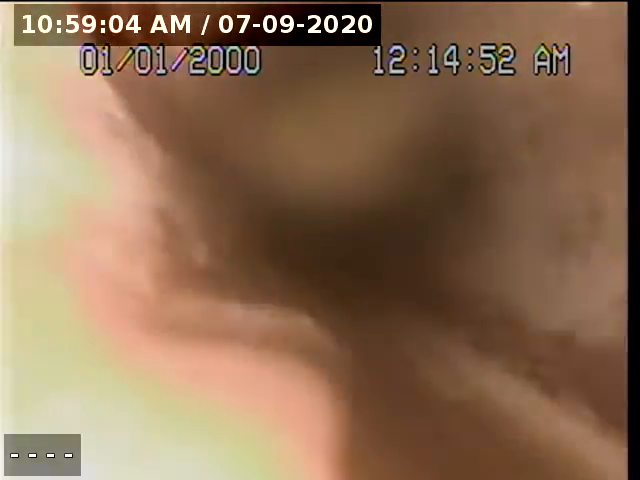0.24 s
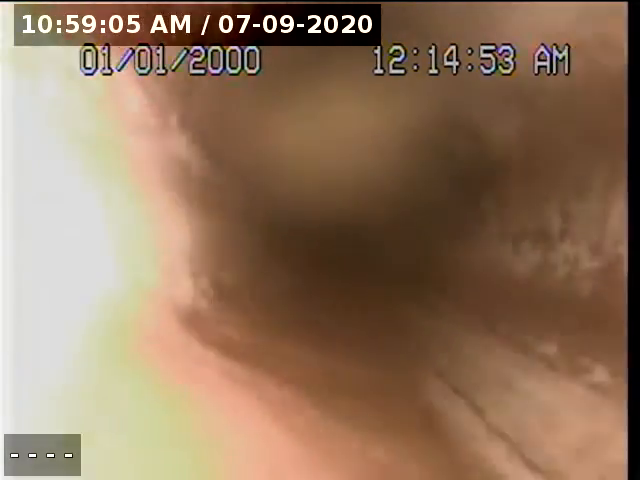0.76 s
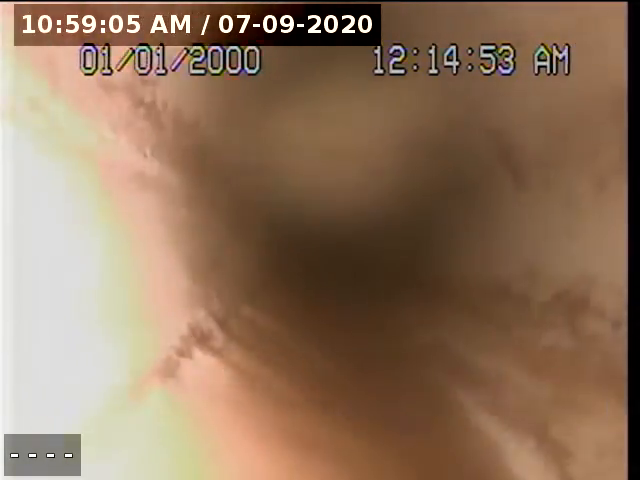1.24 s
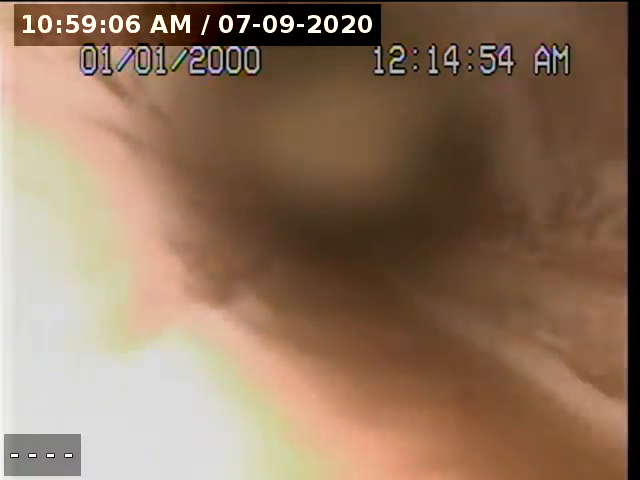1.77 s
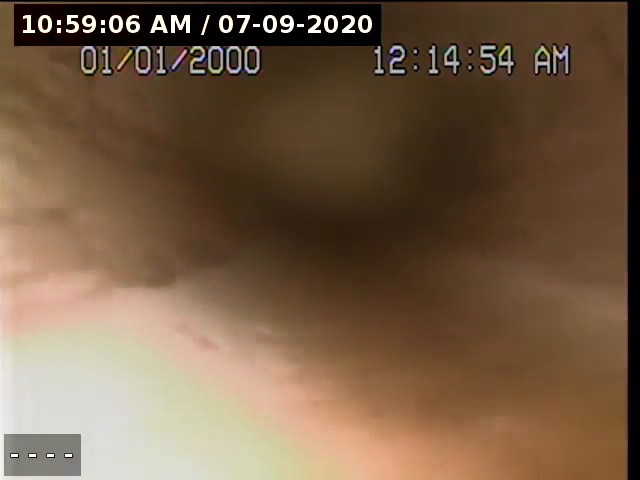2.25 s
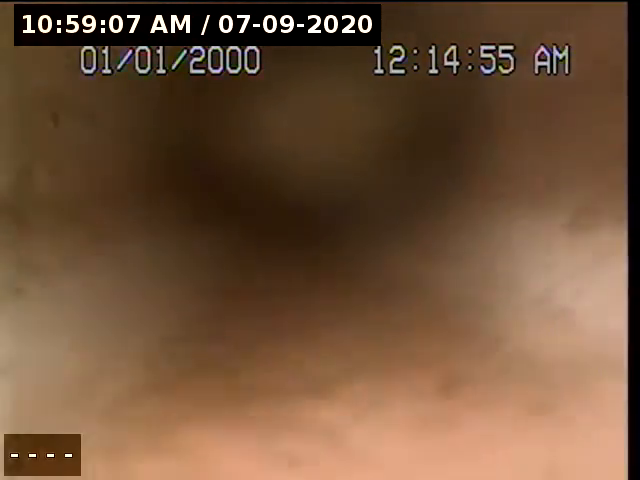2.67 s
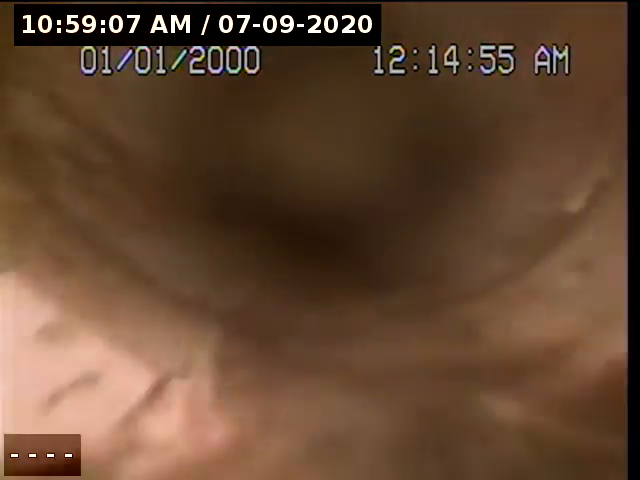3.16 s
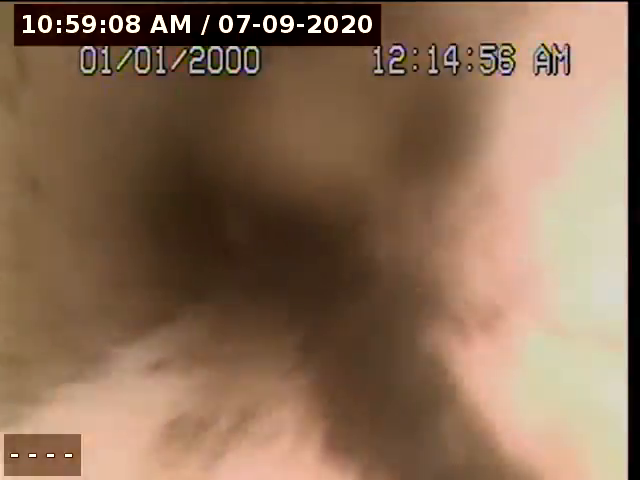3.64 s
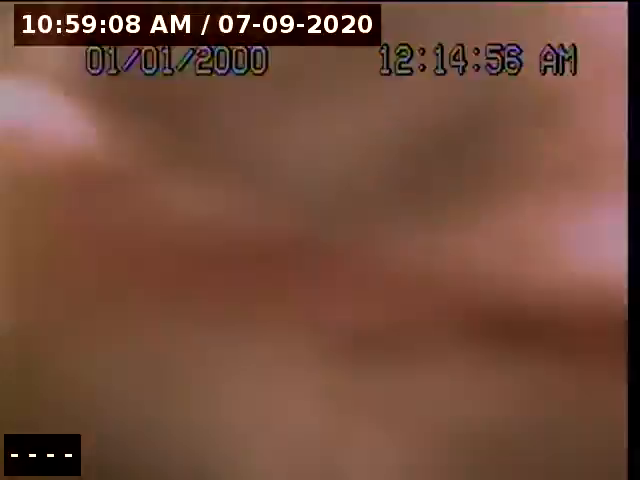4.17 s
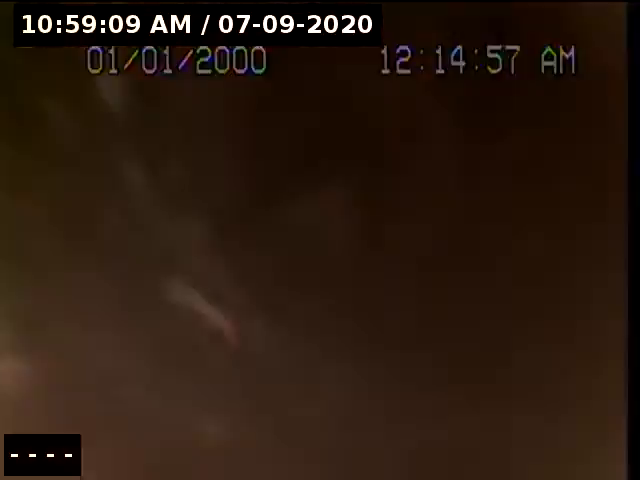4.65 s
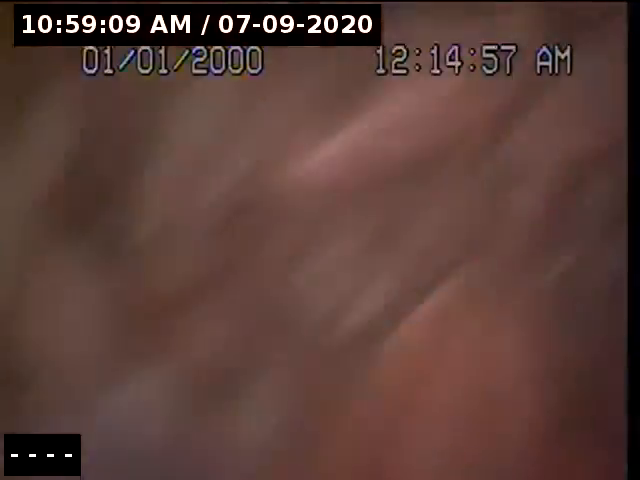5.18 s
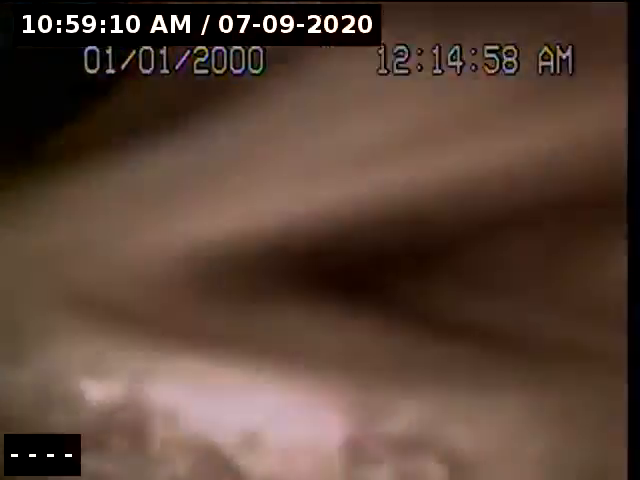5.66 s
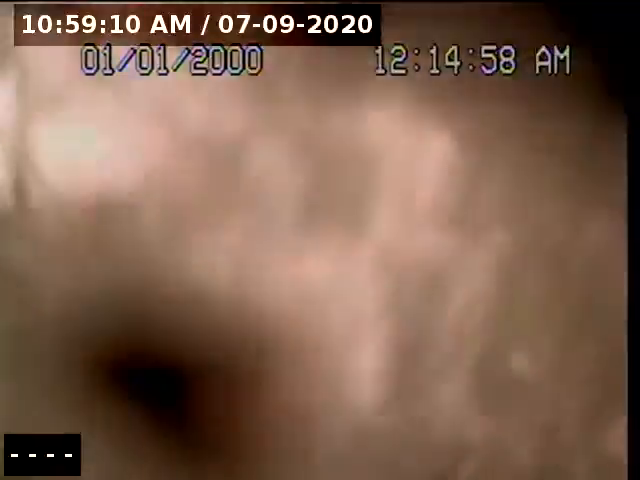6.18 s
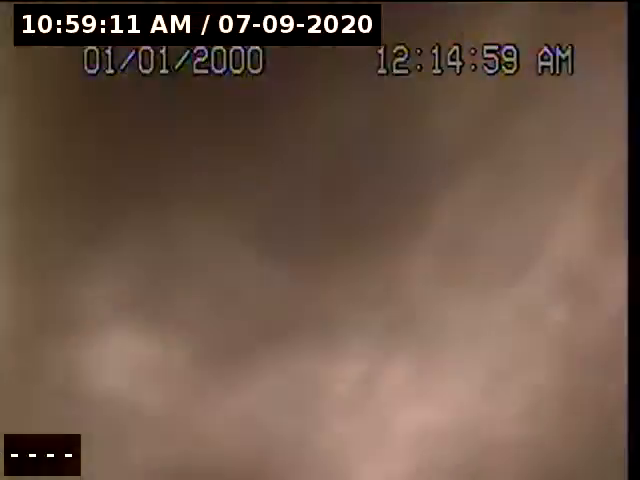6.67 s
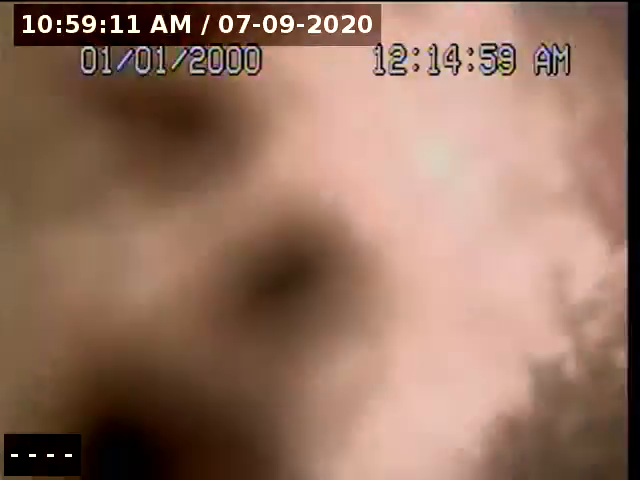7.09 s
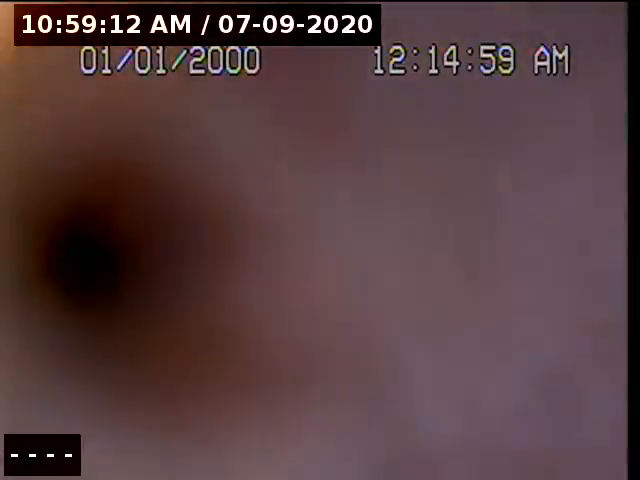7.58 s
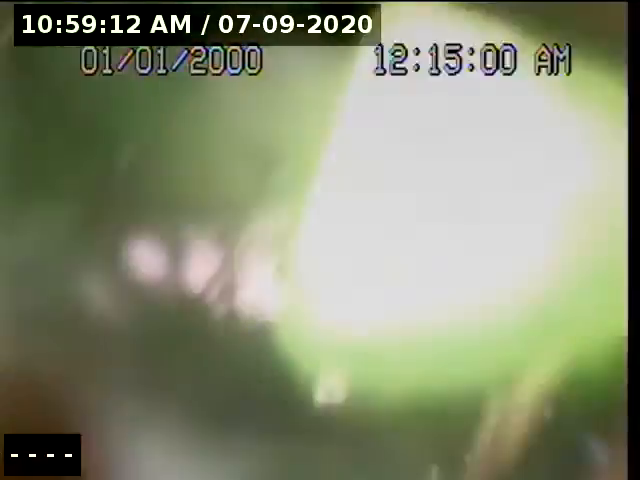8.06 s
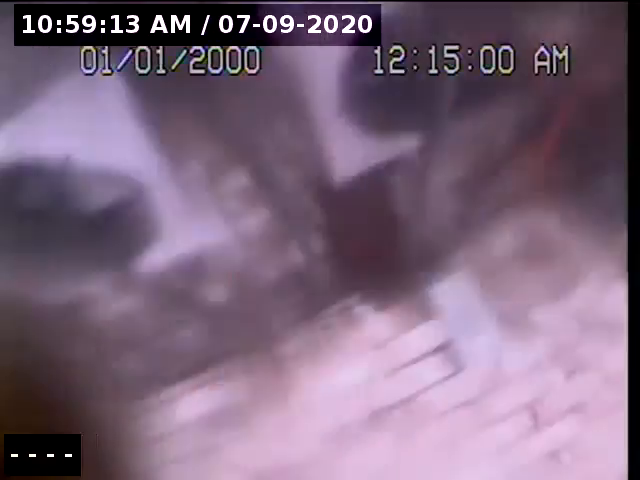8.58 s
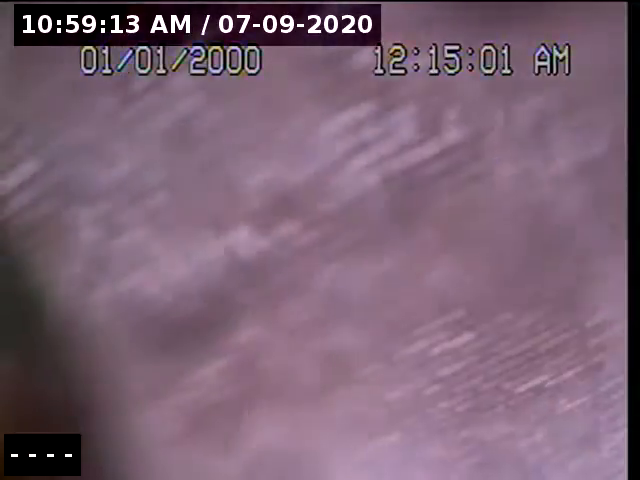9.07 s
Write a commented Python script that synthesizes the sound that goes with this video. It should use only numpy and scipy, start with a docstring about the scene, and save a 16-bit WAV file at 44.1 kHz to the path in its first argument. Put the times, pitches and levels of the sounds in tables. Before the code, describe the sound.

A cable is dragged out of a drain onto a steel reel, rattling steadily with ringing metal knocks over a low engine rumble.

```python
"""Cable hauled onto a steel reel

A push cable is hauled out of a drain and wound on a steel reel next to a cheap microphone.
Filtered noise makes the rumble and the cable's hiss; narrow noise makes the engine tones and squeaks.
The reel frame is a set of ringing tones, set off by rattling taps, knocks and rubs; sharp clicks are added.
The amplifier is lopsided and overloads, and the sound drops out twice."""
import sys
import numpy as np
from scipy import signal
from scipy.fft import rfft, irfft, next_fast_len
from scipy.io import wavfile
from scipy.ndimage import uniform_filter1d

SR = 44100
rng = np.random.default_rng(int(sys.argv[2]) if len(sys.argv) > 2 else 0)


def dump(signal):
    """Clip the signal to [-1, 1] and save it as 16-bit WAV at the path in sys.argv[1]."""
    limited = np.clip(np.atleast_2d(signal).T, -1, 1)
    pcm = np.round(limited * 32767).astype(np.int16)
    wavfile.write(sys.argv[1], SR, pcm)


N = 411436

# ringing tones (modes) of the steel frame: f/Hz, relative level/dB, basic time to fade by 60 dB/s
FRAME_MODES = [(452, -8, .8), (770, -12, .2), (907, -4, .4), (949, -6, .5), (975, -2, .5), (1005, -2, .6),
               (1116, -2, .6), (1190, -12, .3), (1329, -2, .22), (1384, -5, .22), (1410, -8, .25),
               (1476, -5, .22), (1496, 0, .3), (1516, -3, .3), (1574, -5, .3), (1720, -13, .25),
               (1850, -7, .42), (1915, -7, .25), (2014, -7, .3), (2130, -11, .3), (2300, -4, .2),
               (2462, -1, .25), (2504, -1, .33), (2568, 0, .38), (2640, -2, .28), (2715, -3, .25),
               (2790, -5, .2), (2960, -16, .2), (3150, -20, .12)]
# tone colour of the dull clatter of loose parts: f/Hz, relative level/dB
CLATTER_COLOUR = [(400, -40.5), (800, 4.5), (1200, 3.5), (1580, -2), (1660, -1.5), (2780, -3.5), (2900, -8),
                  (3700, -40.5), (4300, -72)]
# tone colour of the hiss of sliding and touching parts: f/Hz, relative level/dB
HISS_COLOUR = [(1200, -49.5), (2200, 9), (3200, -5), (4600, 0), (7200, 1.5), (7800, -9), (8700, -17)]


def amp(db):
    """Turns decibels into a plain multiplier."""
    return 10 ** (np.asarray(db) / 20)


def evened(x):
    """Scales a signal to an average strength (rms) of one."""
    return x / np.sqrt(np.mean(x ** 2) + 1e-20)


def colour(x, points):
    """Makes each pitch region louder or softer, following (f/Hz, level/dB) points."""
    size = next_fast_len(len(x))
    hz, db = np.transpose(points)
    log_hz = np.log(np.fft.rfftfreq(size, 1 / SR) + 1)  # the 1 avoids the log of zero
    gain = amp(np.interp(log_hz, np.log(hz), db))
    return irfft(rfft(x, size) * gain, size)[:len(x)]


def wander(hz):
    """Smoothed noise of rms one that drifts by chance; a higher hz makes it drift faster."""
    noise = rng.standard_normal(N)
    return evened(signal.lfilter([1], [1, -np.exp(-2 * np.pi * hz / SR)], noise))


def resonate(x, hz, width):
    """One resonance: it answers most strongly near hz, and a narrow width (Hz) rings longer."""
    r = np.exp(-np.pi * width / SR)
    return signal.lfilter([1 - r, 0, r - 1], [1, -2 * r * np.cos(2 * np.pi * hz / SR), r * r], x)


def swell(length, size):
    """A smooth rise and fall over length seconds, then silence."""
    return np.sin(np.pi * np.minimum(np.arange(size) / SR / length, 1)) ** 2


def patchy(x, patchy_db):
    """Makes random patches of pitch and time louder or softer."""
    spectrum = signal.stft(x, nperseg=2048)[2]
    field = uniform_filter1d(rng.standard_normal(spectrum.shape), size=2, axis=0)  # across pitch
    field = uniform_filter1d(field, size=5, axis=1)  # across time
    return evened(signal.istft(spectrum * amp(patchy_db * evened(field)))[1][:N])


def frame_answer(drive, damping, lean_db):
    """A running force makes the frame's modes ring; lean_db(hz) sets how strongly each one answers."""
    # soft contacts carry little treble
    soft = signal.sosfilt(signal.butter(4, 3300, fs=SR, output="sos"), drive)
    rings = 0
    for hz, db, t60 in FRAME_MODES:
        width = damping * 2.2 / t60  # Hz: a longer ring is a narrower resonance
        rings = rings + amp(db + lean_db(hz)) * np.sqrt(t60) * resonate(soft, hz, width)
    return evened(rings)


def haul_db():
    """How hard the cable is hauled, given as the level of the frame's rattle over time."""
    # strength of the haul: t/s, rattle level/dB
    haul = [(0.0, -32), (0.5, -41.5), (0.8, -36.5), (0.998, -41), (2.498, -39), (4.101, -36), (4.41, -39.5),
            (4.77, -32), (5.06, -36.5), (5.27, -39.5), (5.531, -33), (5.861, -41.5), (6.07, -43),
            (6.56, -40.5), (9.33, -44.5)]
    return np.interp(np.arange(N) / SR, *np.transpose(haul))


def street(throb=0.21, flutter_db=0.24):
    """Broad rumble that throbs with the engine's firing, and the engine's fuzzy tones of narrow noise."""
    # tone colour of the rumble: f/Hz, relative level/dB
    rumble = [(20, -30), (50, -20), (78, -19.5), (105, -12), (165, -5.5), (227, -4.5), (272, -7), (367, -2),
              (467, -6.5), (630, -1.5), (1100, -10.5), (1540, -10), (1620, -13), (2360, -21), (3600, -43),
              (4700, -74.5)]
    # fuzzy engine tones: f/Hz, resonance width/Hz (applied twice), level/dB
    engine = [(116.5, 9, -52), (178.95, 8.9, -48.5), (231.1, 16.5, -44.5), (636.7, 73, -44)]
    firing_hz = 56.5  # average; it drifts by a few percent
    start_db, end_db = -34, -35.5  # rumble level
    turns = np.cumsum(firing_hz * (1 + 0.029 * wander(1.76))) / SR
    wash = patchy(colour(rng.standard_normal(N), rumble), patchy_db=2.0)
    wash = wash * (1 + throb * np.cos(2 * np.pi * turns))
    tones = 0
    for hz, width, db in engine:
        narrow = resonate(rng.standard_normal(N), hz, width)
        tones = tones + amp(db) * evened(resonate(narrow, hz, width))
    return amp(np.linspace(start_db, end_db, N) + flutter_db * wander(12.0)) * wash + tones


def rattle(per_s=410.0, spread_db=1.0, damping=1.14):
    """Loose parts tap the frame many times a second; it answers with dull clatter and short rings."""
    taps = (rng.random(N) < per_s / SR) * rng.choice([-1., 1.], N)
    taps *= amp(spread_db * np.minimum(rng.exponential(1, N), 4) + 3.7 * wander(16.0))
    taps += taps.std() * rng.standard_normal(N)  # far taps blur into noise
    # the rings weaken by 6 dB per octave of pitch
    rings = frame_answer(taps, damping, lambda hz: -6. * np.log2(hz / 1000))
    clatter = evened(colour(taps, CLATTER_COLOUR))
    return amp(haul_db()) * evened(clatter + rings)


def cable(flutter_db=1.0):
    """The cable sheath hisses as it slides over the rim, more on a hard haul."""
    usual_db, follows = -60, 0.44  # hiss level at an average haul, and dB of hiss per dB of haul
    haul = haul_db() - haul_db().mean()
    level_db = usual_db + follows * haul + flutter_db * wander(25.)
    return amp(level_db) * evened(colour(rng.standard_normal(N), HISS_COLOUR))


def knock(ring_db, spot, clatter_db, thud_db, tick_db, chance, noise):
    """The modes near the spot struck ring, under a burst of clatter, a thud and a treble tick."""
    # tone colour of the thud: f/Hz, relative level/dB
    thud_colour = [(50, -29.5), (170, -0.5), (300, 2), (600, -1), (900, -41), (1500, -69)]
    clatter_t60, tick_t60, thud_t60 = .14, .11, 0.22  # s, time to fade by 60 dB
    below_slope, above_slope = 31.5, -18.5  # dB per octave: modes far from the spot ring less
    t = np.arange(noise.shape[1]) / SR
    hz, db, t60 = np.transpose(FRAME_MODES)[:, :, None]
    away = np.log2(hz / 1000) - spot  # octaves
    lean_db = np.where(away < 0, below_slope, above_slope) * np.maximum(away, -.6)
    struck_db = ring_db + lean_db + 0.96 * (chance[0] - .5)
    ring_stretch = 1.15 * amp(0.28 * ring_db)  # harder knocks ring longer
    fade_db = -60 * t / (ring_stretch * t60)
    modes = amp(db + struck_db + fade_db) * np.sin(2 * np.pi * (hz * t + chance[1]))
    beat_hz = 9.8 + 17.0 * chance[2]
    modes *= 1 + 0.72 * np.cos(2 * np.pi * (beat_hz * t + chance[0]))  # each mode pulses (beats)
    ring = modes.sum(0) * (1 - np.exp(-t / 0.0039))  # soft start
    lean = np.hstack([hz, 0.35 * lean_db])  # clatter leans to the modes that ring
    clatter = evened(colour(colour(noise[0], CLATTER_COLOUR), lean))
    clatter = amp(clatter_db - 60 * t / clatter_t60) * clatter
    thud = amp(thud_db - 60 * t / thud_t60) * evened(colour(noise[1], thud_colour))
    contacts = amp(4.3 * evened(uniform_filter1d(noise[1], size=90)))  # the parts touch in spurts
    tick = amp(tick_db - 60 * t / tick_t60) * evened(colour(noise[2] * contacts, HISS_COLOUR))
    rise = 1 - np.exp(-t / 0.0013)
    return ring + rise * (clatter + thud + tick)


def knocks():
    """Sets off the frame's rings and bursts of noise at each knock."""
    # knocks on the frame: t/s, ring level/dB, spot struck/octaves above 1 kHz,
    # clatter level/dB, thud level/dB, treble tick level/dB (levels before the fade)
    knock_list = [(0.047, -19.5, 0.23, -18, -27, -53.5), (0.29, -30, 0.66, -40, -35.5, -58),
                  (0.478, -30, 0.25, -26, -37, -54), (0.505, -18, 0.55, -16.5, -26, -40),
                  (0.586, -26.5, 0.25, -31.5, -39, -64), (0.868, -23.5, 0.41, -23, -37, -65),
                  (1.098, -31, 0.26, -34.5, -42, -63), (1.351, -38, 0.38, -45, -43, -66),
                  (1.555, -29, 0.28, -26, -40, -63), (2.016, -35, 0.65, -26.5, -27, -39.5),
                  (2.611, -22.5, 0.42, -22.5, -36, -54), (2.803, -28.5, 0.26, -23, -34, -73),
                  (3.001, -23, 0.55, -25.5, -26.5, -57), (3.143, -22.5, 0.076, -21.5, -32, -76),
                  (3.349, -29, 0.46, -37, -39, -71), (4.329, -36, 1.5, -28, -41, -39.5),
                  (4.71, -19, 0.77, -27, -29.5, -54), (4.894, -40, 1, -34.5, -34, -44),
                  (4.925, -36, 1.9, -38, -46, -44), (5.351, -17.5, 0.64, -26, -27, -61),
                  (5.665, -22, 0.68, -37, -45, -58), (5.673, -13.5, 0.24, -18, -43, -47),
                  (5.771, -14, 0.31, -26.5, -39, -51), (5.783, -16, 0.088, -20.5, -37, -50),
                  (6.443, -12, 0.6, -20.5, -37, -27), (6.451, -17.5, 0.47, -16, -27, -27),
                  (6.49, -19, 0.57, -23.5, -25, -60), (6.71, -47, 0.65, -31.5, -39, -47),
                  (6.769, -6.5, 0.35, -9.5, -17.5, -15), (6.79, -10, 0.19, -7.5, -17, -19),
                  (6.812, -15, 0.64, -19, -24, -32), (7.62, -24, 0.51, -13, -24.5, -32),
                  (7.71, -33, 0.53, -27.5, -50, -54), (8.579, -36, 0.21, -29, -34.5, -67)]
    out, size = np.zeros(N + SR), 16384
    fade_out = np.minimum(np.linspace(4, 0, size), 1)  # over the last quarter
    for s, *row in knock_list:
        chance = rng.random((3, len(FRAME_MODES), 1))
        sound = knock(*row, chance=chance, noise=rng.standard_normal((3, size)))
        at = max(round((s - .003) * SR), 0)  # begin 3 ms early, for the soft start
        out[at:at + size] += sound * fade_out
    return out[:N]


def squeaks():
    """Faint, short, fuzzy whistles: noise squeezed through a narrow resonance."""
    # high squeaks: start t/s, length/s, f/Hz, level before the swell/dB
    squeak_list = [(.36, .08, 4800, -57), (.93, .05, 4850, -62), (5.16, .05, 4800, -59)]
    out, size = np.zeros(N + SR), SR // 4
    for s, length, hz, db in squeak_list:
        at = round(s * SR)
        whistle = evened(resonate(rng.standard_normal(size), hz, 40.))
        out[at:at + size] += amp(db) * whistle * swell(length, size=size)
    return out[:N]


def rubs():
    """The cable rubs on the frame: grainy friction sounds the modes near the place rubbed, and hisses."""
    # rubs: start t/s, length/s, level/dB, centre of the modes it sounds f/Hz, hiss level before the swell/dB
    rub_list = [(1.69, 0.081, -30, 1620, -70), (1.70, 0.033, -50, 1930, -65),
                (3.69, 0.061, -34.5, 1580, -55), (3.855, 0.12, -33.5, 1910, -60),
                (3.943, 0.062, -38, 3120, -50), (3.993, 0.08, -39.5, 2800, -44.5),
                (4.066, 0.069, -47, 1920, -51), (4.619, 0.054, -38, 825, -52),
                (4.792, 0.059, -34, 1010, -43), (5.158, 0.1, -33, 880, -90),
                (5.308, 0.095, -26.5, 1990, -55), (5.34, 0.088, -21.5, 880, -53),
                (5.373, 0.088, -20.5, 1390, -62), (5.839, 0.23, -33, 1056, -77),
                (6.627, 0.037, -57, 1500, -54.5), (7.476, 0.27, -58, 1230, -59),
                (7.858, 0.2, -57, 2500, -54.5)]
    damping = 1.6  # the touching cable shortens the ring
    out, size = np.zeros(N + SR), 16384
    for s, length, level_db, centre_hz, hiss_db in rub_list:
        grain, air = rng.standard_normal((2, size))
        shape = swell(length, size=size)
        drag = grain * amp(1.3 * evened(uniform_filter1d(air, size=150))) * shape
        ring = frame_answer(drag, damping, lambda hz: -70. * np.log2(hz / centre_hz) ** 2)
        ring = ring + 0.52 * evened(colour(drag, CLATTER_COLOUR))
        hiss = amp(hiss_db) * evened(colour(air, HISS_COLOUR)) * shape
        at = round(s * SR)
        share = np.sqrt(length * SR / size / 2)  # ring was evened over the whole stretch, rub is shorter
        out[at:at + size] += amp(level_db) * ring * share + hiss
    return out[:N]


def clicks():
    """Dry treble clicks: single sharp impulses with the bass filtered away."""
    # clicks: t/s, impulse level before the filter/dB
    click_list = [(5.1184, -17), (5.6786, -10), (5.7844, -10), (6.4935, -16), (6.8295, -12), (6.8435, -12)]
    out = np.zeros(N)
    for s, db in click_list:
        out[round(s * SR)] = amp(db)
    return signal.sosfilt(signal.butter(2, 2800., "high", fs=SR, output="sos"), out)


def scene():
    """All sources add up at the one microphone."""
    return (street() + rattle() + cable() + knocks() + rubs() + squeaks() + clicks())[None]


def record(dry):
    """A lopsided amplifier squashes loud peaks; then come tone colour, dropouts and a treble limit."""
    # response of the sound channel, with a deep notch: f/Hz, level/dB
    channel = [(2800, 0), (3600, -4), (3880, -16), (4000, -45), (4130, -17), (4600, -3), (8000, -4),
               (8800, -14)]
    # silent gaps: from t/s, to t/s
    dropouts = [(.6875, .7888), (4.9493, 5.0501)]
    roof_up, roof_down = .7, .56  # where the amplifier overloads, upward and downward
    edge_hz = 8667  # little passes above this
    lopsided = dry[0] * (1 + 0.29 * np.tanh(dry[0] / 0.24))  # positive swings grow, negative ones shrink
    # coupling capacitor: removes the steady offset and the deepest bass, below about 6 Hz
    lopsided = signal.lfilter([1, -1], [1, -np.exp(-2 * np.pi * 6.0 / SR)], lopsided)
    roof = np.where(lopsided > 0, roof_up, roof_down)
    clipped = lopsided / (1 + (lopsided / roof) ** 6) ** (1 / 6)
    out = colour(clipped, channel)
    t = np.arange(N) / SR
    for start, end in dropouts:
        out = out * ((t < start) | (t > end))
    low_pass = signal.firwin(511, edge_hz, window=("kaiser", 9), fs=SR)
    return signal.oaconvolve(out, low_pass, "same")[None]


dry = scene()
out = record(dry)
dump(out)
```